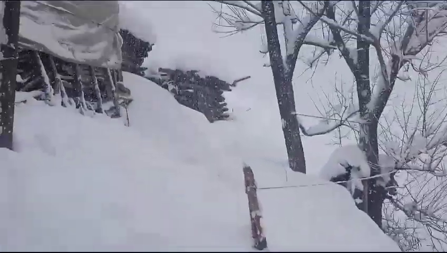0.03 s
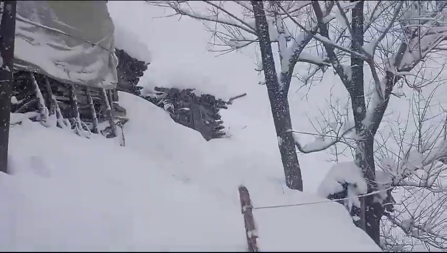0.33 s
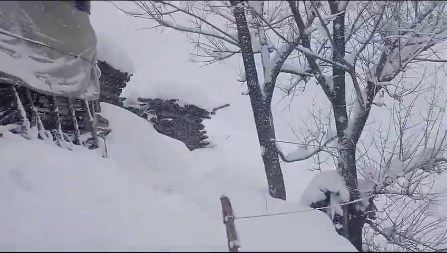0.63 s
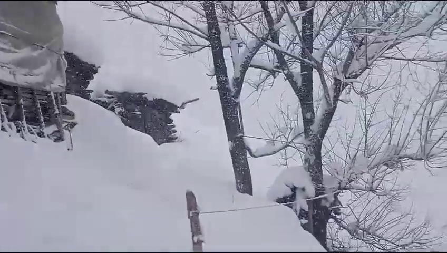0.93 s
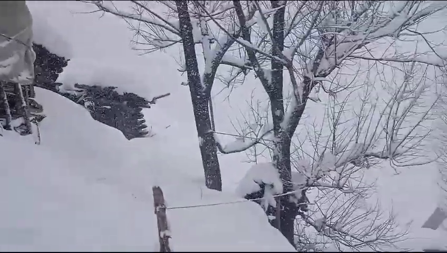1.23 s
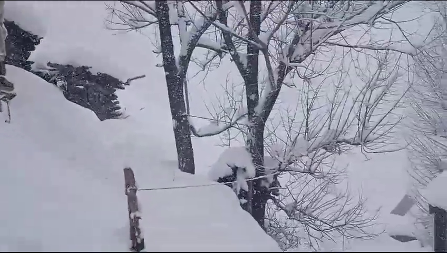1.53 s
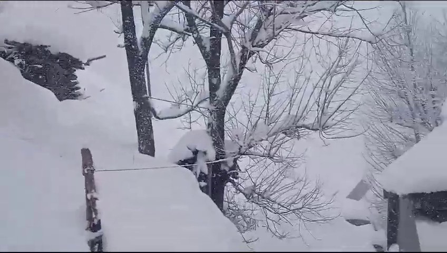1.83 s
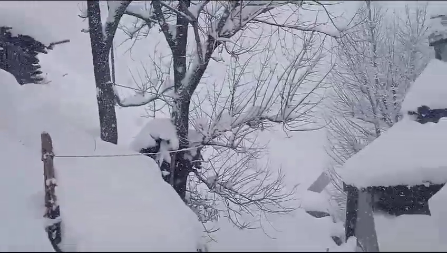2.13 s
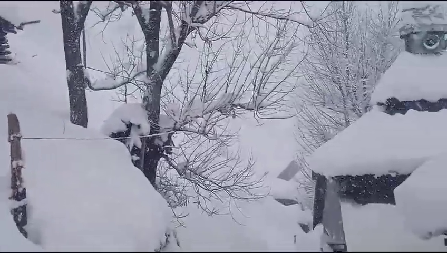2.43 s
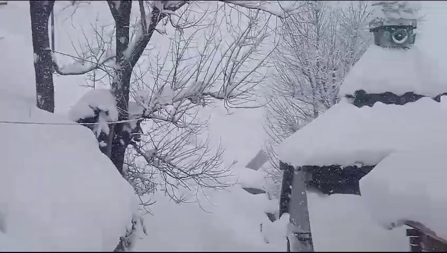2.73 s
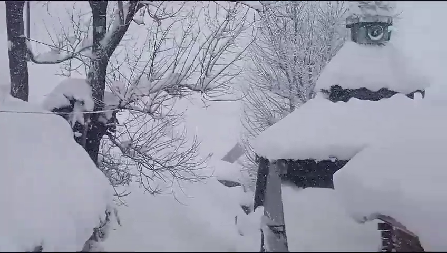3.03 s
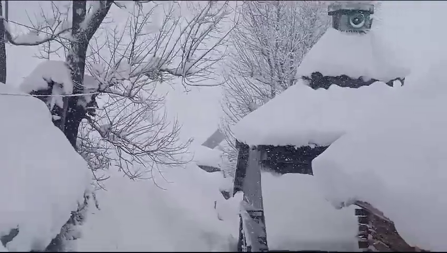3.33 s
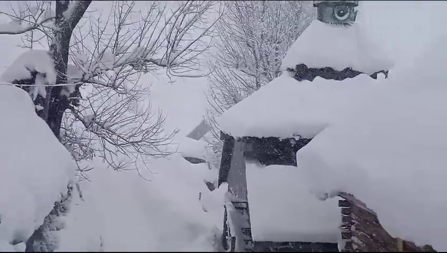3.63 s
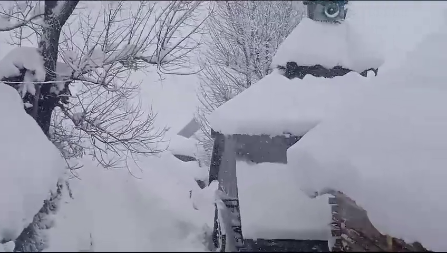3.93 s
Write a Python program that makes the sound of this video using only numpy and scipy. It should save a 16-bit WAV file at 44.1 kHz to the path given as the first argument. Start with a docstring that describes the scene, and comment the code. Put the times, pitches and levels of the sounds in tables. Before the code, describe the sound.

Light wind rumbling softly on the microphone, with handling bumps and faint snow ticks.

```python
"""Light wind and snowfall in a quiet yard.

Puffs of air and the grip of a hand thump a hand-held microphone over a low turbulent rumble,
hardest near the end. A thin hiss swells and fades over the distant wash of still air.
Snow grains land close by as tiny impacts, and a few faint tones arrive from far away."""
import sys
import numpy as np
from scipy import signal
from scipy.fft import rfft, irfft
from scipy.io import wavfile
from scipy.ndimage import uniform_filter1d

SR = 44100
rng = np.random.default_rng(int(sys.argv[2]) if len(sys.argv) > 2 else 0)


def output_pcm(signal):
    """Save a mono or channel-first signal as 16-bit PCM at the path in sys.argv[1].

    Samples are clipped to [-1, 1] before scaling.
    """
    pcm = np.clip(np.atleast_2d(signal).T, -1, 1) * 32767
    wavfile.write(sys.argv[1], SR, np.round(pcm).astype(np.int16))


N = 176400
TIME = np.arange(N) / SR

# Strength of the wind's rumble. Each row: time in seconds, level in dB.
GUST_LEVEL = [(0, -64.5), (.11, -62), (.16, -83), (.2, -76), (.25, -64), (.34, -65.5), (.48, -50.5),
              (.565, -60), (.7, -53), (.8, -56), (.89, -62.5), (.98, -45), (1.11, -65.5), (1.24, -59),
              (1.35, -67.5), (1.45, -71), (1.51, -77.5), (1.62, -61), (1.66, -71), (1.71, -65), (1.75, -58),
              (1.97, -53.5), (2.09, -69), (2.18, -53), (2.22, -60.5), (2.36, -61.5), (2.43, -78.5),
              (2.68, -69), (2.76, -87), (2.95, -82), (3.03, -53), (3.14, -56), (3.24, -63.5), (3.3, -50.5),
              (3.4, -54), (3.46, -59), (3.51, -51), (3.55, -48.5), (3.62, -40), (3.67, -41), (3.72, -40.5),
              (3.77, -72.5), (3.84, -50.5), (3.9, -48), (3.94, -40), (4, -51.5)]
# Spectra of the rumble and the finer eddies. Each row: frequency in Hz, relative density in dB.
RUMBLE_SPECTRUM = [(20, -35), (40, -15.5), (75, 2), (120, 1), (190, -11), (300, -25), (500, -45),
                   (900, -66.5), (2000, -87)]
EDDY_SPECTRUM = [(60, -25), (160, -0.5), (280, 0.5), (420, -0.5), (650, -25.5), (1400, -58), (3000, -93)]
# Spectra of the distant wash and the thin hiss. Each row: frequency in Hz, relative density in dB.
WASH_SPECTRUM = [(20, 10.5), (80, 6), (200, -1), (500, 5), (900, 0), (1600, -3), (2600, -13), (4200, -14.5),
                 (6200, -25), (8000, -34), (13800, -23.5), (15000, -30.5), (16000, -7.5)]
HISS_SPECTRUM = [(500, -26), (1200, -12), (1750, 0), (2250, -2), (3100, 2.5), (4300, -4.5), (5100, -1),
                 (5700, 3), (6500, 1.5), (7800, -13), (9500, -11), (13800, -22.5), (14900, -1), (15800, -7)]
# Swells of the wash and the hiss. Each row: time in seconds, level in dB.
WASH_SWELL = [(0, -77), (.4, -80.5), (.9, -78.5), (1.12, -75.5), (1.26, -81.5), (1.42, -74), (1.6, -79),
              (1.85, -76), (2.05, -80), (2.45, -76.5), (2.95, -80), (3.3, -77.5), (4, -81.5)]
HISS_SWELL = [(0, -82), (.14, -77.5), (.28, -81), (.42, -92.5), (.62, -94), (.78, -76.5), (.84, -80.5),
              (.97, -76.5), (1.07, -92.5), (1.2, -82), (1.29, -87.5), (1.43, -81.5), (1.58, -90),
              (1.76, -88), (1.94, -81), (2.11, -89), (2.35, -88), (2.55, -77), (2.68, -94), (2.79, -97),
              (2.9, -82), (3.05, -83), (3.13, -92.5), (3.46, -86), (3.54, -91), (3.69, -86), (3.76, -72.5),
              (3.86, -83), (3.94, -77.5), (4, -83.5)]
# Puffs and handling bumps. Each row: start in seconds, level in dB, treble roll-off in Hz.
PRESSURE_PULSES = [(0.092, -49.5, 114), (0.385, -44.5, 117), (0.461, -50, 190), (0.529, -40, 187),
                   (0.598, -42.5, 116), (0.643, -41.5, 87), (0.722, -43, 100), (0.753, -47, 175),
                   (0.969, -44.5, 137), (1.004, -43, 131), (1.076, -42.5, 92), (1.154, -45, 113),
                   (1.293, -44.5, 96), (1.581, -39, 94), (1.687, -35, 244), (1.8, -46.5, 163),
                   (1.938, -38.5, 221), (1.952, -36, 109), (2.019, -52.5, 154), (2.167, -38, 104),
                   (2.381, -44.5, 93), (2.527, -50.5, 179), (2.654, -54.5, 98), (3.024, -41.5, 100),
                   (3.092, -44, 187), (3.132, -32.5, 138), (3.49, -41.5, 228), (3.577, -29.5, 328),
                   (3.591, -25, 408), (3.609, -24, 313), (3.642, -30, 248), (3.69, -25, 443),
                   (3.702, -24.5, 380), (3.801, -42.5, 163), (3.922, -31.5, 162), (3.946, -37, 189),
                   (3.975, -36.5, 222)]
# Clear, close ticks. Each row: start in seconds, level in dB, band centre in Hz, half-width in octaves.
CLOSE_IMPACTS = [(0.496, -76.5, 3000, 1.7), (0.782, -65, 5400, 1.3), (1.022, -66.5, 3500, 1.3),
                 (1.156, -60, 5000, 0.5), (1.367, -61, 8000, 1.4), (1.425, -62, 7000, 1.6),
                 (1.527, -61.5, 4400, 0.5), (1.627, -67.5, 5000, 0.5), (1.934, -66, 6500, 0.9),
                 (2.065, -67.5, 3500, 0.52), (2.195, -62.5, 3360, 0.76), (2.2, -60.5, 5500, 1),
                 (2.248, -71, 6030, 0.4), (2.272, -66, 5900, 1), (2.3, -64, 7500, 1.3),
                 (2.6, -62, 5700, 1.3), (2.699, -73.5, 4500, 0.97), (2.731, -67, 4300, 0.13),
                 (3.175, -60.5, 2540, 0.8), (3.188, -64, 4000, 1.2), (3.332, -67, 4400, 0.25),
                 (3.351, -65.5, 5740, 0.76), (3.361, -68, 4900, 1.1), (3.456, -63.5, 3970, 1.5),
                 (3.498, -67.5, 4900, 0.59), (3.619, -65, 5080, 0.2), (3.806, -57.5, 3770, 1.5),
                 (3.827, -64.5, 4200, 1), (3.841, -62, 6170, 0.39)]
# Colour common to all ticks. Each row: frequency in Hz, relative gain in dB.
IMPACT_SPECTRUM = [(300, -24), (1500, 3), (3200, -0.5), (4300, -7), (6400, 2), (8000, -11.5), (13500, -13),
                   (15300, 3.5), (16500, -5)]
# Faint far tones. Each row: start in seconds, length in seconds, pitch in Hz, peak level in dB.
DISTANT_TONES = [(2.64, 0.083, 872, -79), (2.78, 0.12, 980, -81), (3.2, 0.055, 803, -80),
                 (3.325, 0.078, 529, -65)]


def amp(db):
    """Amplitude grows tenfold for every 20 dB."""
    return 10 ** (np.asarray(db) / 20)


def unit(x):
    """Division by the rms gives a signal of unit power."""
    return x / np.sqrt(np.mean(x ** 2) + 1e-30)


def spectral_gain(spectrum, hz):
    """A spectrum in dB, interpolated over log frequency, gives the gain at each frequency."""
    knots_hz, db = np.transpose(spectrum)
    return amp(np.interp(np.log(hz + 1), np.log(knots_hz + 1), db))


def add(mix, start_s, sound):
    """Superposition: a sound adds to the mix from its start time on."""
    at = round(start_s * SR)
    sound = sound[max(-at, 0):]
    part = mix[max(at, 0):][:len(sound)]
    part += sound[:len(part)]


def wander(rate_hz):
    """Low-pass filtering turns white noise into smooth random motion of rms 1."""
    hz = np.fft.rfftfreq(N, 1 / SR)
    return unit(irfft(rfft(rng.standard_normal(N)) * np.exp(-(hz / rate_hz) ** 2), N))


def patchy_noise(spectrum, patchy_db, size=1024):
    """Random modulation over time and frequency gives coloured noise, of rms 1, drifting patches."""
    cells = signal.stft(rng.standard_normal(N), nperseg=size)[2]
    patches = uniform_filter1d(rng.standard_normal(cells.shape), size=5, axis=0)
    patches = unit(uniform_filter1d(patches, size=7, axis=1))
    mottled = signal.istft(cells * amp(patchy_db * patches), nperseg=size)[1][:N]
    return unit(irfft(rfft(mottled) * spectral_gain(spectrum, np.fft.rfftfreq(N, 1 / SR)), N))


def wind(eddy_growth=1.1, reference_gust_db=-47.5):
    """Turbulent pressure rumbles at the microphone; the finer eddies grow faster than the gust."""
    gust_db = np.interp(TIME, *np.transpose(GUST_LEVEL))
    eddy_db = -72.5 + eddy_growth * (gust_db - reference_gust_db)
    rumble = patchy_noise(RUMBLE_SPECTRUM, patchy_db=1) * unit(amp(2.1 * wander(rate_hz=41)))
    eddies = patchy_noise(EDDY_SPECTRUM, patchy_db=2) * unit(amp(5 * wander(rate_hz=70)))
    return rumble * amp(gust_db) + eddies * amp(eddy_db)


def still_air():
    """Amplitude modulation of broadband noise: a distant wash swells and a thin hiss comes and goes."""
    wash = patchy_noise(WASH_SPECTRUM, patchy_db=2.5)
    hiss = patchy_noise(HISS_SPECTRUM, patchy_db=3)
    wash_db = np.interp(TIME, *np.transpose(WASH_SWELL))
    hiss_db = np.interp(TIME, *np.transpose(HISS_SWELL)) + wander(rate_hz=45)
    return wash * amp(wash_db) + hiss * amp(hiss_db)


def microphone_response(hz, cutoff_hz=93, case_hz=111.8, case_q=1.8):
    """A third-order high-pass cuts the bass, and a damped resonance of the case adds a low ring."""
    s, c = 1j * hz / cutoff_hz, 1j * hz / case_hz
    bass_cut = s ** 3 / ((s + 1) * (s * s + s + 1))
    ring = c / case_q / (c * c + c / case_q + 1)
    return bass_cut * (1 + 0.67 * ring)


def thumps(push_delay_s=0.0018, swirl_lead_s=0.0032, swirl_rise_s=0.003, size=8192):
    """Each soft pressure pulse, wrapped in brief turbulence, excites the microphone's low resonance."""
    out, hz = np.zeros(N), np.fft.rfftfreq(size, 1 / SR)
    mic = microphone_response(hz)
    t = (np.arange(size) - size // 2) / SR
    age = np.maximum(t + swirl_lead_s, 0) / swirl_rise_s
    for start_s, db, rolloff_hz in PRESSURE_PULSES:
        push_spectrum = np.exp(-(hz / rolloff_hz) ** 1.614)
        push = np.roll(irfft(push_spectrum * mic), size // 2)
        push *= amp(-0.5) / abs(signal.hilbert(push)).max()
        swirl_band = hz / (hz + rolloff_hz) / (1 + (hz / rolloff_hz / 1.17) ** 4.66)
        burst = rng.standard_normal(size) * age * np.exp(-age)
        swirl = irfft(rfft(burst) * swirl_band * mic)
        swirl *= amp(-13.5) / np.sqrt(uniform_filter1d(swirl ** 2, size=400).max())
        add(out, start_s + push_delay_s - size / 2 / SR, (push + swirl) * amp(db))
    return out


def tick(centre_hz, octaves, decay_s, size=1024):
    """A tiny impact is a brief broadband burst; the narrower its band, the longer it rings."""
    t, hz = np.arange(size // 2) / SR, np.fft.rfftfreq(size, 1 / SR)
    burst = np.r_[np.zeros(size // 2), rng.standard_normal(size // 2) * np.exp(-t / decay_s)]
    detuning = np.log2((hz + 1) / centre_hz) / octaves
    colour = spectral_gain(IMPACT_SPECTRUM, hz) / (1 + detuning ** 2)
    impact = irfft(rfft(burst) * colour)
    return impact / np.sqrt(2 * uniform_filter1d(impact ** 2, size=40).max())


def snowfall(grains_per_s=35, decay_s=0.0006):
    """Independent impacts of snow grains form a faint shot noise beneath the clearer ticks."""
    out, count = np.zeros(N), int(grains_per_s * N / SR)
    impacts = [(start_s, db + 1, hz, octaves) for start_s, db, hz, octaves in CLOSE_IMPACTS]
    for when, weight, colour in rng.random((count, 3)):
        db = -77 + min(-np.log(weight), 3)
        centre_hz = 3450 * 2 ** (1.24 * colour)
        impacts.append((when * N / SR, db, centre_hz, 0.7))
    for start_s, db, centre_hz, octaves in impacts:
        impact = tick(centre_hz, octaves, decay_s)
        lead_s = len(impact) / 2 / SR + decay_s / 2  # the burst begins halfway through the array
        add(out, start_s - lead_s, impact * amp(db))
    return out


def far_tones(sag=0.01, waver_depth=0.024):
    """Frequency modulation makes short, soft, distant tones waver and sag slightly in pitch."""
    out, waver = np.zeros(N), wander(rate_hz=170)
    for start_s, length_s, hz, db in DISTANT_TONES:
        progress = np.arange(0, length_s, 1 / SR) / length_s
        jitter = waver_depth * waver[round(start_s * SR):][:len(progress)]
        pitch_hz = hz * (1 + sag * (0.5 - progress) + jitter)
        envelope = amp(db) * np.sin(np.pi * progress)
        add(out, start_s, envelope * np.sin(2 * np.pi * np.cumsum(pitch_hz) / SR))
    return out


def scene():
    """The pressures of all sources add linearly at one microphone."""
    return (wind() + still_air() + thumps() + snowfall() + far_tones())[None]


def record(dry):
    """A linear-phase low-pass filter limits the band to 15.9 kHz."""
    low_pass = signal.firwin(511, 15900, window=("kaiser", 9), fs=SR)
    return signal.oaconvolve(dry, low_pass[None], "same")


dry = scene()
out = record(dry)
output_pcm(out)
```